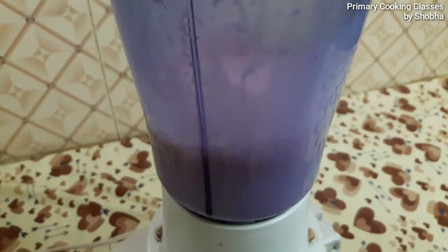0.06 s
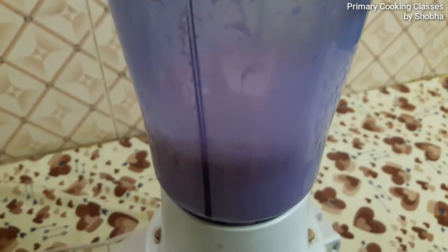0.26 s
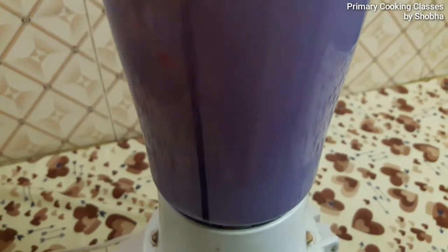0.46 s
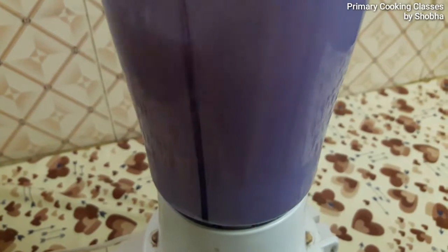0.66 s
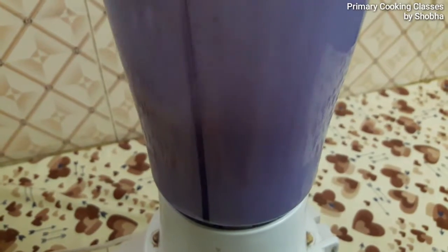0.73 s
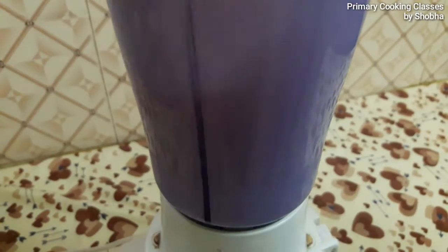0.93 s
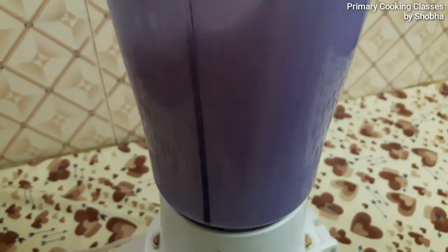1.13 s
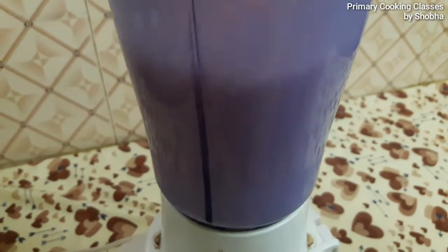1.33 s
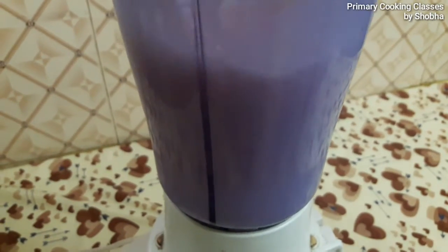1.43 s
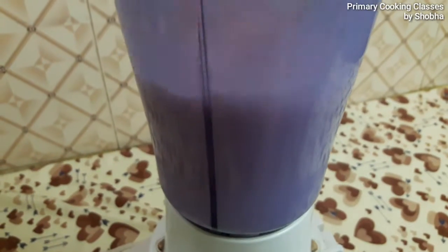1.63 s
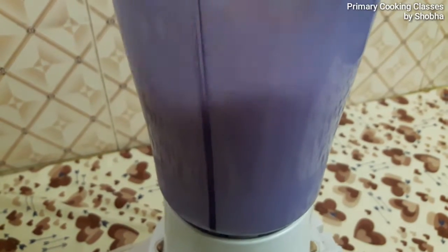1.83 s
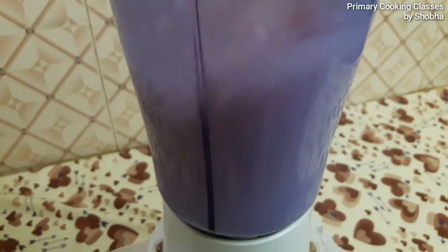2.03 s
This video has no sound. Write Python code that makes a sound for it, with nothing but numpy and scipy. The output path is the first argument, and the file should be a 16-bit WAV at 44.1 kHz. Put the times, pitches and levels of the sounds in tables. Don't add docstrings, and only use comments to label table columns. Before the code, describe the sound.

A blender clacks on and churns ice and liquid, ice knocking the plastic jar, close up

```python
import sys
import numpy as np
from scipy import signal
from scipy.io import wavfile

SR = 44100
rng = np.random.default_rng(int(sys.argv[2]) if len(sys.argv) > 2 else 0)


def transcribe(signal):
    frames = np.atleast_2d(signal).T
    limited = np.clip(frames, -1, 1)
    pcm = np.round(limited * 32767).astype(np.int16)
    wavfile.write(sys.argv[1], SR, pcm)


def magnitude_from_level(level_db):
    exponent = np.asarray(level_db, float) / 20
    return 10 ** exponent


N = 92169
START_S = 0.336


def unit(x):
    return x / np.sqrt(np.mean(x ** 2) + 1e-20)


def in_time(rows):
    return np.interp(np.arange(N) / SR, *np.transpose(rows))


def steep(x, hz, kind, order=3):
    return signal.sosfilt(signal.butter(order, hz, kind, fs=SR, output="sos"), x)


def drift(rate_hz):
    r = np.exp(-40 * np.pi * rate_hz / SR)
    white = rng.standard_normal(N // 20 + 2002)
    slow = signal.lfilter([1], [1, -2 * r, r * r], white)[2000:]
    return np.interp(np.arange(N) / 20, np.arange(len(slow)), unit(slow))


def ring(clicks, hz, t60):
    r, w = magnitude_from_level(-60 / (t60 * SR)), 2 * np.pi * hz / SR
    return signal.lfilter([0, np.sin(w)], [1, -2 * r * np.cos(w), r * r], clicks + 1e-18)


def at_times(s, db):
    out = np.zeros(N)
    out[np.minimum((np.atleast_1d(s) * SR).astype(int), N - 1)] = magnitude_from_level(db)
    return out


def strike(s, db, modes, spread_db):
    chance = rng.standard_normal((len(s), len(modes)))
    out = 0
    for k, (hz, mode_db, t60) in enumerate(modes):
        out = out + ring(at_times(s, db + mode_db + spread_db * chance[:, k]), hz, t60)
    return out


def rattle(per_s, spread_db, modes):
    sizes = magnitude_from_level(spread_db * np.minimum(rng.exponential(1, N), 4)) * rng.choice([-1, 1], N)
    clumped_rate = per_s * magnitude_from_level(3.0 * drift(35.0))
    clicks = sizes * (rng.random(N) < clumped_rate / SR)
    return unit(sum(ring(clicks * rng.standard_normal(N), hz, t60) * magnitude_from_level(db) for hz, db, t60 in modes))


def running():
    return np.clip((np.arange(N) / SR - START_S) / 0.0024, 0, 1)


# time in seconds, shaft speed in turns per second, whine level in dB.
SHAFT = [
    (.336, 135, -75),
    (.5, 150, -62),
    (.65, 158, -52),
    (.82, 168, -47),
    (.98, 170, -47),
    (1.1, 171, -54),
    (1.7, 175, -53),
    (1.85, 176, -47),
    (2.09, 178, -47),
]


def turns_per_s():
    return in_time(np.array(SHAFT)[:, :2])


def spin():
    return turns_per_s() / 166.5


# time in seconds, level in dB.
STIRRING = [
    (0.34, -25),
    (0.388, -23),
    (0.51, -20.5),
    (0.71, -21.5),
    (1.778, -21.5),
    (2.09, -18.5),
]


def vigour():
    return magnitude_from_level(in_time(STIRRING)) * running()


# time in seconds, peak level in dB, pitch in Hz.
ICE_KNOCKS = [(0.3363, 0, 2440), (0.3608, -7.5, 1880), (0.3783, -7.5, 1890), (0.3969, -13, 1850),
              (0.4348, 0, 1480), (0.4445, -8, 1690), (0.4522, -5, 1980), (0.4561, 0, 1400),
              (0.4984, -5, 1880), (0.502, -10, 1900), (0.5509, -8, 1880), (0.5556, -4, 1950),
              (0.6134, -2.5, 1890), (0.6325, -5.5, 2000), (0.6639, 3.5, 1860), (0.6976, -3, 1880),
              (0.7145, -6, 2070), (0.7414, -4, 1920), (0.7749, -4.5, 1920), (0.8697, -2, 1750),
              (0.8759, 5.5, 1890), (1.0036, 0, 1790), (1.057, 3, 1940), (1.1968, -3.5, 1880),
              (1.283, -3.5, 1890), (1.395, -6, 1930), (1.4379, -2, 1900), (1.4963, -2.5, 1990),
              (1.6543, -3.5, 1920), (1.8338, -10, 1940), (1.9996, -7, 1900), (2.0567, -7, 2000),
              (0.5166, -9, 1830), (0.527, -5, 2170), (1.0236, -7, 1910), (1.0762, -10, 1930),
              (1.3064, -1, 1850), (1.365, -5, 1930), (1.4545, -9, 1920), (1.5186, -11, 1950),
              (1.6422, -8, 2000), (1.664, -2.5, 1920), (1.7548, -3, 1930), (1.858, -8, 2140),
              (1.931, -8, 1880), (1.957, -2, 1890), (2.018, -19, 1920)]
# pitch in Hz, level in dB, time to die by 60 dB in seconds.
JAR_WALL = [(838, -5, 0.0097), (1444, -9.5, 0.0093), (1464, -15, 0.026), (1500, -10, 0.0028),
            (1880, -15, 0.034), (1930, -11.5, 0.031), (1970, -9.5, 0.017), (2224, -0.5, 0.0092),
            (2620, -8.5, 0.0091), (3195, -9, 0.0053)]


def jar():
    s, db, _ = np.transpose(ICE_KNOCKS)
    wall = strike(s, db - 18, JAR_WALL, spread_db=1.5)
    wall += ring(at_times(s, db - 17), 1926, 0.021)
    wall += magnitude_from_level(-5.5) * spin() * vigour() * rattle(1500, 0.5, JAR_WALL)
    tone_t60 = 0.007
    for s, db, hz in ICE_KNOCKS:
        swell = ring(ring(at_times(s, db - 9.5), hz, tone_t60), hz, tone_t60)
        wall += swell * 20 / (tone_t60 * SR)
    contact = np.hanning(int(0.0004 * SR))
    wall = signal.lfilter(2 * contact / contact.sum(), 1, wall)
    return steep(wall, [1030, 4170], "band")


# time in seconds, peak level in dB, pitch in Hz.
CHIP_CRACKS = [(0.3364, -25, 8900), (0.343, -17.5, 7100), (0.3616, -15, 6700), (.363, -19.5, 5200),
               (.378, -30, 11500), (0.4104, -16, 6700), (.416, -20, 5800), (0.4537, -14, 9300),
               (0.471, -12, 6950), (0.502, -19, 8300), (0.514, -10.5, 8750), (.526, -18, 6500),
               (.609, -21.5, 7100), (0.643, -14.5, 7050), (0.775, -19, 7640), (0.8317, -12, 6500),
               (0.8771, -14, 5930), (0.884, -15, 7400), (0.909, -13, 6560), (.975, -17, 9500),
               (0.9963, -11.5, 8560), (1.039, -20, 5960), (1.058, -21, 6000), (1.099, -12, 7600),
               (1.233, -23, 5460), (1.3353, -13, 7400), (1.363, -10.5, 6300), (1.4313, -25, 10900),
               (1.4995, -15, 12400), (1.5005, -18, 13700), (1.58, -17, 7500), (1.755, -13, 6400),
               (1.8264, -17, 8500), (1.9938, -14, 5900), (2.0, -17, 9000)]
# pitch in Hz, level in dB, time to die by 60 dB in seconds.
BLADE_MODES = [(5750, -3, 0.0066), (6430, 6.5, 0.0029), (6970, 4, 0.0044), (7600, -2, 0.0075),
               (8360, -2.5, 0.005), (8830, 2, 0.008), (10900, 9, 0.0015), (12500, -7, 0.0026)]


def blades():
    metal = splinters() + magnitude_from_level(-11.5) * spin() ** 2.4 * vigour() * rattle(2100, 0, BLADE_MODES)
    metal += sum(ring(at_times(s, db - 6), hz, 0.007) for s, db, hz in CHIP_CRACKS)
    return steep(metal, 1140, "high")


def splinters():
    out, t = np.zeros(N + 900), np.arange(900) / SR
    width, t60 = 1.59, 0.013
    for s, db, hz in CHIP_CRACKS:
        dying = rng.standard_normal(len(t)) * magnitude_from_level(-60 * t / t60)
        burst = steep(dying, [hz / width, min(hz * width, 19000)], "band")
        start = int(s * SR)
        out[start:start + len(t)] += magnitude_from_level(db) * burst
    return out[:N]


# pitch in Hz, level in dB per Hz.
JUICE_COLOUR = [(35, -66), (60, -15), (171, -14), (351, -7.5), (475, -11), (1870, -7), (4030, -21.5),
                (8470, -19), (15500, -25)]


def coloured_noise(patchy_db):
    hz, db = np.transpose(JUICE_COLOUR)
    edges = 40 * 2 ** np.arange(0, 8.8, 1 / 3)
    out, together = 0, drift(9.0)
    white = rng.standard_normal((2, N))
    for k, (low, high) in enumerate(zip(edges, edges[1:])):
        part = steep(white[k % 2], [low, high], "band", order=2)
        level_db = np.interp(np.log(low * high) / 2, np.log(hz), db)
        out = out + part * magnitude_from_level(level_db + patchy_db * (0.7 * together + drift(14.0)))
    return unit(out)


def juice():
    return magnitude_from_level(-5) * vigour() * spin() ** 1.53 * coloured_noise(1.5)


def fan():
    hz, t60 = 8430, 0.0045
    hiss = unit(ring(ring(rng.standard_normal(N), hz, t60), hz, t60))
    return magnitude_from_level(-20) * spin() ** 7 * vigour() * hiss


# multiple of shaft speed, level in dB rms, pitch wander as a share.
HUM_ORDERS = [(1, -43, .04), (2, -41, .03), (3, -47, .025), (4, -44, .02), (5, -43, .015), (6, -47, .006)]
# multiple of shaft speed, level in dB, pitch wander as a share.
CONTACT_ORDERS = [(38, 4, .005), (50, 2, .006), (62, 6, .004)]


def motor():
    speed = turns_per_s()

    def order(multiple, db, wander):
        level = np.sqrt(2) * magnitude_from_level(db + 3.5 * drift(8.2))
        turns = np.cumsum(speed * (1 + wander * drift(26.5))) / SR
        return level * np.sin(2 * np.pi * multiple * turns)

    hum = spin() * sum(order(*row) for row in HUM_ORDERS)
    whine = sum(drift(110) * order(*row) for row in CONTACT_ORDERS)
    whine_level = magnitude_from_level(in_time(np.array(SHAFT)[:, ::2]))
    return running() * (hum + whine_level * whine)


# time in seconds, peak level in dB, pitch in Hz, time to die by 60 dB in seconds.
BASE_THUMPS = [(0.343, -16, 294, 0.059), (0.364, -8.5, 385, 0.042), (0.381, -9, 391, 0.059),
               (0.411, -12.5, 355, 0.028), (0.442, -13.5, 342, 0.057), (0.454, -8, 339, 0.052),
               (.462, -13.5, 581, 0.061), (0.474, -14.5, 311, 0.054), (.483, -16.5, 557, .03),
               (0.531, -19.5, 319, 0.14), (0.553, -28, 317, .08), (0.578, -23, 322, 0.095),
               (0.739, -18.5, 324, 0.064)]


def base():
    jolts = 0
    for s, db, hz, t60 in BASE_THUMPS:
        jolts = jolts + ring(at_times(s, db - 1.5), hz, t60)
        jolts = jolts + ring(at_times(s, db - 15), hz * 1.7, t60)
    return steep(jolts, 900, "low", order=2)


# time in seconds, dull body in dB, bright edge in dB,
# edge centre in Hz, time for the edge to die by 60 dB in seconds.
SWITCH_CLACKS = [(.003, -34, -23.5, 6600, 0.022), (0.0322, -12, -52, 5000, .02),
                 (0.034, -5, -3, 6000, 0.013), (0.05, -16, -27.5, 7360, 0.15),
                 (0.092, -24, -12, 8950, 0.0093), (.19, -29, -57, 5040, 0.0081),
                 (.222, -65.5, -56, 6500, 0.0081), (.2365, -68, -46, 11200, 0.0053),
                 (0.238, -33.5, -38, 7600, 0.15), (0.275, -49, -71.5, 5970, 0.01),
                 (.317, -71, -48, 7500, 0.017), (.327, -62, -51, 12500, 0.018)]


def switch():
    t, out = np.arange(N) / SR, 0
    white = rng.standard_normal((2, N))
    width = 1.506
    for s, body_db, edge_db, hz, edge_t60 in SWITCH_CLACKS:
        begun, since = t >= s, np.maximum(t - s, 0)
        body = begun * magnitude_from_level(body_db + 0.5 - 60 * since / 0.031)
        edge = begun * magnitude_from_level(edge_db + 0.5 - 60 * since / edge_t60)
        out = out + steep(white[0] * body, [1020, 3420], "band")
        out = out + steep(white[1] * edge, [hz / width, min(hz * width, 19000)], "band")
    return out


ROOM_T60_S = 0.39


def kitchen(x):
    t = np.arange(int(0.6 * SR)) / SR
    white = rng.standard_normal(len(t))
    low = steep(white, 7500, "low", order=2)
    tail = low * magnitude_from_level(-60 * t / ROOM_T60_S) + (white - low) * magnitude_from_level(-60 * t / (ROOM_T60_S * 0.28))
    soaked = signal.butter(2, [3700, 5600], "band", fs=SR, output="sos")
    tail -= 0.55 * signal.sosfiltfilt(soaked, tail)
    tail *= np.clip(t / 0.0012, 0, 1)
    return signal.fftconvolve(x, tail / np.sqrt(np.sum(tail ** 2)))[:N]


def still_room():
    dull = steep(coloured_noise(0.8), 5400, "low", order=1)
    hum = magnitude_from_level(-60.5) * unit(ring(rng.standard_normal(N), 183, 0.14))
    earlier_tail = magnitude_from_level(-28.5 - 60 * np.arange(N) / SR / ROOM_T60_S) * dull
    return magnitude_from_level(-52) * dull + hum + earlier_tail


def rumble():
    low = unit(steep(rng.standard_normal(N), 110, "low"))
    since = np.maximum(np.arange(N) / SR - START_S, 0) / 0.037
    kick_db = 25.5 * 2 * since / (1 + since ** 2)
    return low * (magnitude_from_level(-75) + running() * magnitude_from_level(-66 + kick_db + 3.2 * drift(7.7)))


def scene():
    hits = jar() + blades() + fan() + switch()
    jolts = base()
    echo = magnitude_from_level(-8.5) * kitchen(hits + magnitude_from_level(-8) * jolts)
    air = hits + jolts + echo + juice() + motor() + still_room()
    return (steep(air, 137, "high") + rumble())[None]


def roll_off(x):
    return signal.sosfilt(signal.butter(12, 16230, fs=SR, output="sos"), x)


def record(dry):
    rounded = 1.1 * np.tanh(dry / 1.1)
    top_cut = signal.ellip(11, 0.5, 48, 15450, fs=SR, output="sos")
    mix = signal.sosfilt(top_cut, rounded)
    return roll_off(mix)


dry = scene()
out = record(dry)
transcribe(out)
```